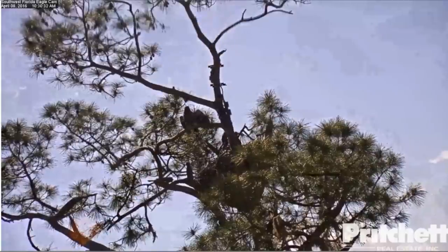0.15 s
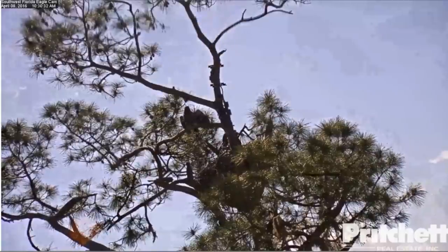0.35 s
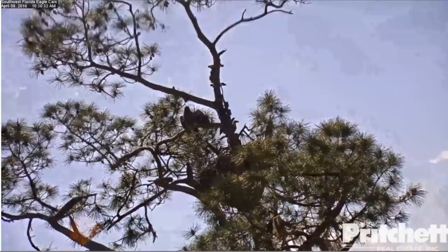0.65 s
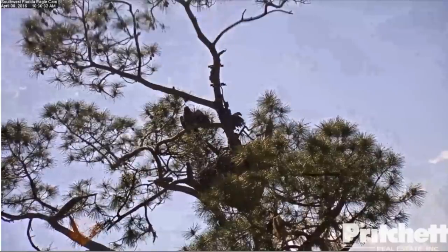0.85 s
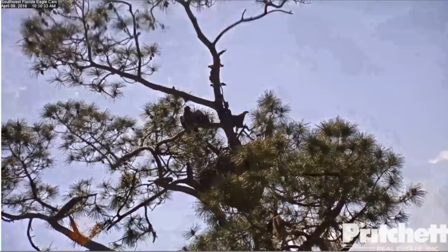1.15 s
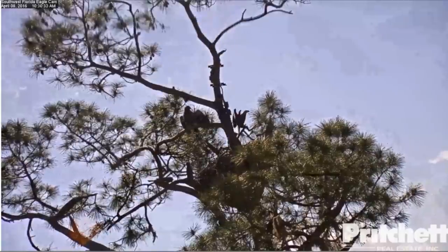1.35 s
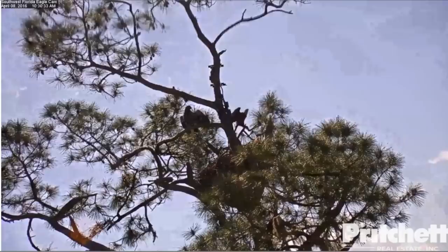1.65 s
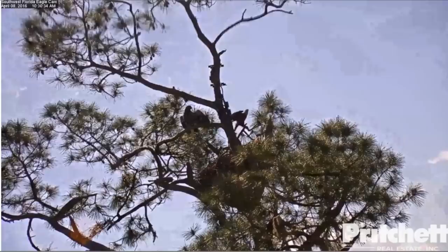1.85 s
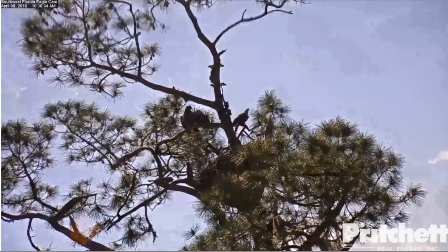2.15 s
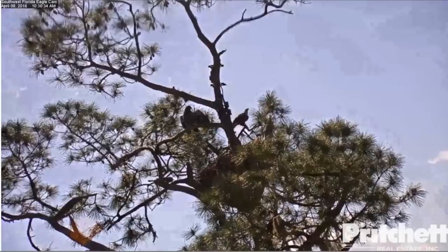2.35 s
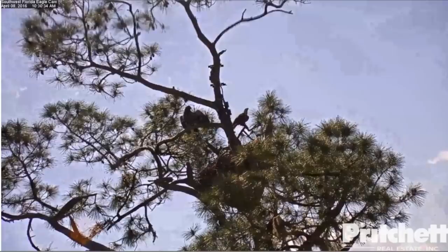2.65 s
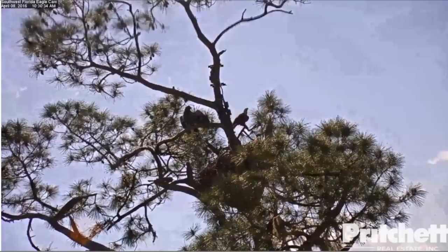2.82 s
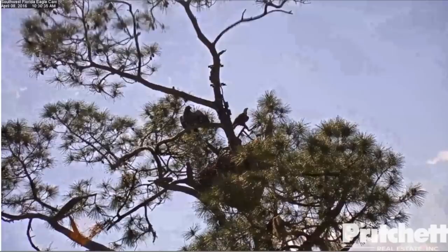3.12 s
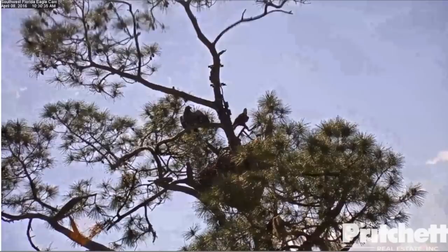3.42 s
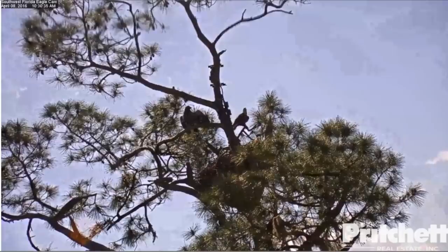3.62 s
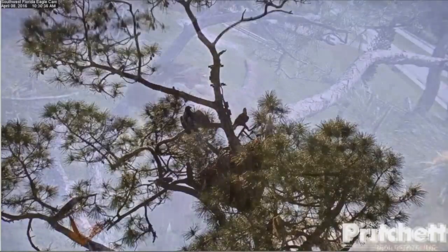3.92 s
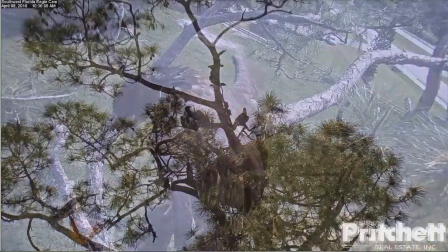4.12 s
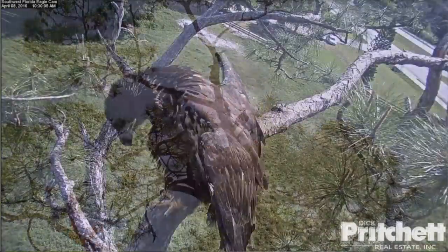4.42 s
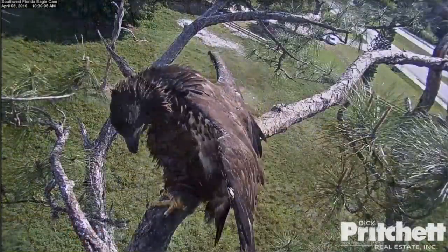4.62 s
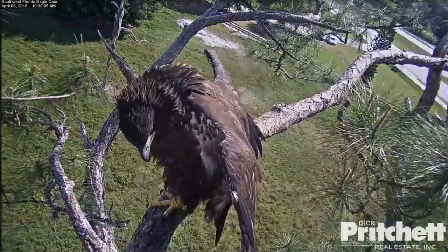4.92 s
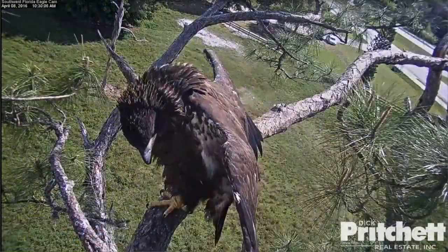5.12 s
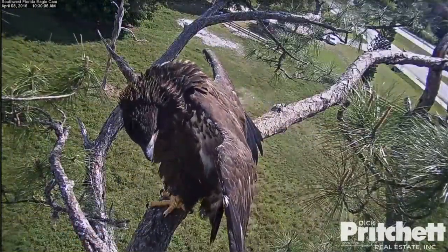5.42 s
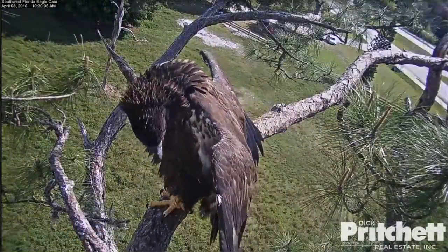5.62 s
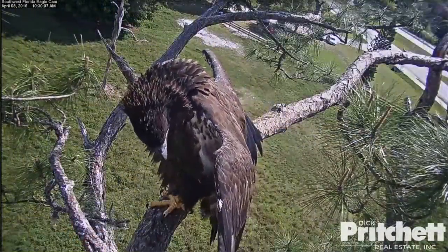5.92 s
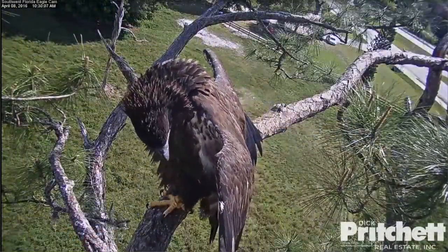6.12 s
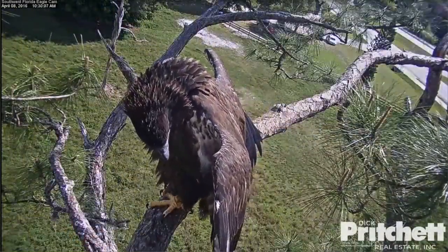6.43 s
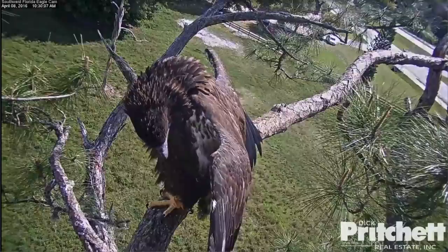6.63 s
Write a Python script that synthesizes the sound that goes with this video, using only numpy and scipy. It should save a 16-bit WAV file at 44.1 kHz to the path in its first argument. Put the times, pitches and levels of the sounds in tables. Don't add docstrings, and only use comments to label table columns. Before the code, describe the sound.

Outdoors in a pine near a nest, a young eagle calls in shrill gliding whistles. Wavering rising notes come first, then a long climb that leaps upward and drops, and another climb. After a pause the calls step higher and become ragged, then hold long and level. One last held whistle ends with a short tail. Soft needle hiss and distant traffic lie beneath; the band-limited microphone distorts slightly and cuts out briefly twice.

```python
import sys
import numpy as np
from scipy import signal
from scipy.fft import rfft, irfft, next_fast_len
from scipy.io import wavfile
from scipy.ndimage import uniform_filter1d, minimum_filter1d, map_coordinates

SR = 44100
rng = np.random.default_rng(int(sys.argv[2]) if len(sys.argv) > 2 else 0)


def gain_from_db(level_db):
    decades = np.asarray(level_db, float) / 20
    return 10 ** decades


def generate_wav(signal):
    frames = np.transpose(np.atleast_2d(signal))
    scaled = np.clip(frames, -1, 1) * 32767
    pcm = np.round(scaled).astype(np.int16)
    wavfile.write(sys.argv[1], SR, pcm)


N = 298557
TIME = np.arange(N) / SR
TURN_S = 0.03

# time in seconds, pitch in Hz, level in dB.
FIRST_CALLS = [
    [(0.0, 3093, -53), (0.064, 3166, -54), (0.084, 3274, -69.5), (0.094, 3365, -53)],
    [(0.098, 3396, -47), (0.18, 3320, -46.5), (0.221, 3230, -55.5), (0.241, 3390, -48),
     (0.279, 3490, -44.5), (0.46, 3395, -44.5), (0.53, 3428, -48.5), (0.65, 3476, -47.5),
     (0.705, 3560, -45)],
    [(0.742, 2728, -48), (0.747, 2764, -40.5), (0.9, 2807, -40.5), (1.165, 2990, -40.5),
     (1.184, 3330, -39.5), (1.196, 3400, -45.5), (1.215, 3450, -42), (1.271, 3275, -41.5),
     (1.287, 3030, -40.5)],
    [(1.854, 2757, -39), (1.882, 2845, -39.5), (1.995, 3026, -42.5), (2.075, 3257, -40.5),
     (2.147, 3277, -42.5), (2.265, 3423, -40), (2.317, 3370, -43.5), (2.564, 3464, -43.5),
     (2.596, 3403, -42)],
]
# time in seconds, pitch in Hz, level in dB.
CLIMBING_CALLS = [
    [(3.187, 2791, -47.5), (3.221, 2867, -40.5), (3.306, 2844, -49), (3.4, 3007, -40.5),
     (3.52, 3017, -42.5), (3.618, 3267, -44), (3.722, 3303, -48.5), (3.749, 3247, -38.5),
     (3.763, 3334, -46)],
    [(3.771, 3721, -59), (3.835, 3826, -58.5), (3.92, 3896, -49.5), (3.985, 3960, -47),
     (4.017, 3913, -48.5)],
    [(4.141, 4122, -57), (4.165, 3982, -48), (4.179, 4113, -51), (4.294, 4200, -57.5), (4.335, 4334, -54),
     (4.4, 4350, -49.5), (4.438, 4441, -51), (4.452, 4302, -50.5), (4.538, 4469, -56)],
    [(4.691, 4437, -43.5), (4.727, 4517, -42), (4.851, 4335, -42), (4.907, 4461, -42), (4.975, 4400, -42.5),
     (5.124, 4458, -42.5), (5.156, 4350, -42.5), (5.194, 4415, -42), (5.284, 4422, -41)],
]
# time in seconds, pitch in Hz, level in dB.
LAST_CALL = [
    [(5.797, 3818, -46), (5.931, 3973, -51), (6.008, 3965, -41.5), (6.268, 3980, -42.5), (6.368, 4150, -43),
     (6.387, 4045, -41.5), (6.459, 4173, -45), (6.549, 4130, -44), (6.599, 3990, -42)],
    [(6.651, 4050, -43), (6.699, 3940, -41.5), (6.719, 4000, -43), (6.737, 4190, -46.5), (6.765, 4100, -43)],
]
# time in seconds, pitch in Hz, level in dB.
PARTNER = [
    [(0.0, 3400, -74.5), (0.006, 3470, -64.5), (0.05, 3518, -69), (0.094, 3653, -58)],
    [(1.225, 3920, -81.5), (1.243, 4087, -52), (1.255, 3973, -61), (1.269, 3992, -73.5)],
    [(1.84, 3144, -70.5), (1.848, 3061, -47), (1.852, 3040, -62), (1.86, 3032, -77.5)],
    [(2.031, 3737, -58), (2.047, 3811, -61), (2.153, 3921, -53.5), (2.179, 3944, -51.5), (2.219, 3831, -75)],
    [(2.291, 3890, -68.5), (2.313, 4005, -53.5), (2.482, 4022, -54), (2.534, 3961, -57),
     (2.556, 4030, -54.5), (2.586, 3990, -57.5), (2.598, 3980, -66)],
    [(3.147, 2693, -54.5), (3.173, 3040, -51), (3.201, 3249, -56.5), (3.3, 3195, -54.5),
     (3.392, 3387, -57.5), (3.626, 3564, -55), (3.751, 3576, -59.5), (3.791, 3406, -54), (3.997, 3670, -60)],
]
# time in seconds, pitch in Hz, level in dB.
HIGH_PARTNER = [
    [(4.031, 4292, -59), (4.069, 4804, -66.5), (4.101, 4686, -65.5), (4.115, 4750, -72), (4.139, 4673, -63)],
    [(4.246, 3876, -50.5), (4.258, 3428, -50), (4.262, 3234, -52), (4.267, 2907, -54.5)],
    [(4.526, 2825, -49), (4.542, 3614, -51), (4.566, 3383, -46), (4.61, 3392, -44), (4.667, 3803, -43)],
    [(4.673, 4143, -69), (4.69, 4100, -48.5), (4.73, 4162, -60.5)],
    [(5.012, 4320, -64), (5.021, 3853, -49), (5.027, 3590, -44.5), (5.032, 2900, -49)],
    [(5.757, 2500, -56), (5.77, 2750, -44), (5.789, 3210, -40.5), (5.799, 3302, -43.5),
     (5.867, 3338, -44.0), (5.952, 3570, -50), (5.984, 3870, -42)],
    [(6.421, 5010, -99), (6.455, 5056, -69), (6.509, 4930, -62.5), (6.539, 5160, -77), (6.599, 5330, -65)],
    [(6.651, 4630, -56.5), (6.691, 4530, -60), (6.713, 4770, -71.5), (6.729, 4760, -89)],
]
# time in seconds, pitch in Hz, level in dB.
STRAY_WHISTLES = [
    [(4.051, 3657, -68), (4.087, 3920, -61), (4.117, 3686, -58), (4.149, 3670, -57.5)],
    [(5.364, 3685, -56), (5.38, 3605, -52), (5.41, 4238, -60.5), (5.466, 4292, -62.5), (5.507, 4870, -67),
     (5.693, 5189, -74), (5.771, 5060, -63.5), (5.829, 4980, -66)],
]
# start in seconds, overtone in dB, mirror below in dB, mirror above in dB, low tone in dB.
POSTURES = [(0, -41, -18, -5, -32.5), (.746, -11.5, -1, -38, -4.5), (1.8, -12.5, -3.5, -29.5, -8),
            (2.3, -14, 1, -35, -7), (3.1, -40, -17, -12.5, -33), (3.36, -21.5, -15.5, -12.5, -24.5),
            (3.6, -30, -11, -5.5, -25), (3.77, -48.5, -34.5, -31.5, -37.5), (4.5, -52, -43, -45, -24),
            (5.3, -20, -48, -45, -25), (5.75, -27.5, -17, -27, -14.5), (5.97, -56.5, -45.5, -51, -39)]


def eagle():
    notes = phrased(FIRST_CALLS + CLIMBING_CALLS + LAST_CALL)
    turn, loud = syrinx_side(notes, edge_s=0.0052, flutter_hz=8 + spells(column=4))
    partner_turn, soft = syrinx_side(PARTNER + HIGH_PARTNER, edge_s=0.004, flutter_hz=28)
    stray_turn, stray = syrinx_side(STRAY_WHISTLES, edge_s=0.008, flutter_hz=50.3)
    hoarse = 0.004 + uniform_filter1d(spells(column=2), round(TURN_S * SR))
    main = unlocked(turn, lead=0.52) * waver(hoarse)
    partner = soft * partner_turn * waver(hoarse + 0.06)
    overtone, below, above, low = (loud * gain_from_db(db) for db in held(POSTURES))
    ratio = partner / (loud + soft + 1e-5)
    doubled = overtone * (main + 0.5 * ratio) * (main + 0.8 * np.conj(ratio) * turn ** 2)
    mirrored = below * main * turn * np.conj(ratio)
    mirrored = mirrored + above * ratio * partner_turn * np.conj(main)
    difference = low * np.conj(main) * ratio
    overtone_hz = np.gradient(np.unwrap(np.angle(partner_turn))) * SR / np.pi
    ringing = gain_from_db(26) * partner ** 2 * waver(0.81) / (1 + ((overtone_hz - 6600) / 330) ** 4)
    breath = gain_from_db(-28) * loud * turn * (wobble(1500) + 1j * wobble(1500))
    whistles = loud * main + partner + ringing + stray * stray_turn * waver(0.25)
    return np.sqrt(2) * np.real(whistles + doubled + mirrored + difference + breath)


def syrinx_side(notes, edge_s, flutter_hz):
    s, hz, db = np.concatenate(notes).T
    sounding = sum((TIME >= note[0][0]) & (TIME < note[-1][0] + 0.006) for note in notes) > 0
    edge = round(edge_s * SR)
    gate = uniform_filter1d(uniform_filter1d(sounding * 1.0, edge), edge)
    pitch = np.interp(TIME, s, hz) + flutter_hz * wobble(70)
    turn = np.exp(2j * np.pi * np.cumsum(pitch) / SR)
    return turn, gate * gain_from_db(np.interp(TIME, s, db))


CLOSING, HELD_ON = (1, 2, 3, 5, 7), (6,)
FALL_S, SLACK_HZ, FADE_DB = 0.036, 2470, -12.5
KNEE, KNEE_DROP, KNEE_DB = 0.25, 0.17, -4.5
THROAT_HZ, THROAT_AT, SWELL_DB = 2810, 0.74, 2


def phrased(notes):
    done = []
    for k, note in enumerate(notes):
        s, hz, db = note[-1]
        ending = []
        if k in CLOSING:
            knee = (s + KNEE * FALL_S, hz + KNEE_DROP * (SLACK_HZ - hz), db + KNEE_DB)
            swell = (s + THROAT_AT * FALL_S, THROAT_HZ, db + SWELL_DB)
            ending = [knee, swell, (s + FALL_S, SLACK_HZ, db + FADE_DB)]
        elif k in HELD_ON:
            ending = notes[k + 1][:1]
        done.append(note + ending)
    return done


def unlocked(turn, lead):
    beat_hz, more_turns = 240, 0.45
    due = np.cumsum(spells(column=3)) / SR
    luck = rng.random((int(due[-1]), 3))
    starts = np.interp(np.arange(len(luck)) + 0.8 * luck[:, 0], due, TIME)
    turns = 1 + np.minimum(np.floor(np.log(luck[:, 1]) / np.log(more_turns)), 3)
    lengths = turns / beat_hz * (0.5 + 1.2 * luck[:, 2])
    slipped = sum(n * np.clip((TIME - s) / length, 0, 1) for s, length, n in zip(starts, lengths, turns))
    behind = 2 * np.pi * slipped
    return turn * np.exp(0.3j * behind) * (lead + (1 - lead) * np.exp(-1j * behind))


def waver(share):
    return np.sqrt(1 - share) + np.sqrt(share / 2) * (wobble(650) + 1j * wobble(650))


# start in seconds, end in seconds, share of irregular vibration from 0 to 1,
# slips a second, warble in Hz.
ROUGH_SPELLS = [(.19, .235, .15, 70, 25), (.652, .664, .02, 85, 0), (1.23, 1.27, .05, 0, 15),
                (2.33, 2.39, .06, 0, 12), (2.39, 2.59, .14, 55, 15), (3.645, 3.77, .06, 30, 12),
                (4.02, 4.12, .45, 0, 30), (4.15, 4.33, .14, 30, 45), (4.39, 4.47, .15, 50, 35),
                (4.7, 5.27, .006, 0, 8), (5.3, 5.79, .1, 0, 0), (5.8, 5.9, .12, 25, 15),
                (6.02, 6.6, .025, 34, 22), (6.66, 6.69, .05, 70, 15), (6.74, 6.77, .05, 70, 15)]


def spells(column):
    return sum(row[column] * ((TIME >= row[0]) & (TIME < row[1])) for row in ROUGH_SPELLS)


def held(rows):
    s, *columns = np.transpose(rows)
    row = np.searchsorted(s[1:], TIME)
    return [uniform_filter1d(column[row], round(TURN_S * SR)) for column in columns]


# start in seconds, peak in dB, centre in Hz.
BEAK_POPS = [
    (4.649, -60.5, 745),
    (5.028, -56.5, 641),
    (5.3, -55, 108),
]


def beak_pops():
    puffs = np.zeros(N)
    for s, db, hz in BEAK_POPS:
        envelope = np.exp(-((TIME - s - 0.004) / 0.0034) ** 2)
        puffs += gain_from_db(db) * envelope * np.sin(2 * np.pi * hz * (TIME - s))
    return puffs


def branch_echo(voice):
    t = TIME[:SR // 8]
    branches = rng.standard_normal(len(t)) * gain_from_db(-60 * t / 0.069)
    return signal.fftconvolve(voice, branches / np.linalg.norm(branches))[:N]


# time in seconds, level in dB.
WIND_LEVEL = [(0, -62.5), (.5, -64.5), (1.75, -65), (2.5, -66.5), (3.4, -63.5), (4.45, -66), (4.75, -61),
              (5.15, -61.5), (5.6, -65), (6.77, -64)]
# frequency in Hz, density in dB per Hz.
WIND_COLOUR = [(290, -57), (550, -15), (868, -10.5), (1370, -2.5), (1960, -5.5), (2840, 1), (4700, -24.5),
               (6200, -31), (7800, -52.5), (12000, -120)]
# frequency in Hz, density in dB per Hz.
TRAFFIC_COLOUR = [(15, -65.5), (25, -22), (233, -7.5), (358, -6), (448, -7.5), (700, -4.5), (910, -39),
                  (1540, -120)]


def air(voice):
    size = round(0.1 * SR)
    peak = -minimum_filter1d(-np.abs(voice), size, origin=size // 2 - 1)
    duck_db = -1.5 * uniform_filter1d(peak / (peak + gain_from_db(-44.5)), SR // 50)
    wind_db = np.interp(TIME, *np.transpose(WIND_LEVEL)) + 5.5 + duck_db + 0.41 * wobble(6)
    hiss = gain_from_db(wind_db) * rush(WIND_COLOUR, patchy_db=1.5)
    drone = unit(filtered(rng.standard_normal(N), lambda hz: 1 / (1 + ((hz - 133) / 17) ** 2)))
    rumble = rush(TRAFFIC_COLOUR, patchy_db=-2.0) + gain_from_db(-13.5) * drone
    traffic_db = -75.5 + 1.6 * duck_db + 1.7 * wobble(2.3) + 1.3 * wobble(7.6)
    return hiss + gain_from_db(traffic_db) * rumble


def rush(spectrum, patchy_db):
    z = signal.stft(rng.standard_normal(N), nperseg=512)[2]
    field = uniform_filter1d(rng.standard_normal(z.shape), size=5, axis=0)
    field = uniform_filter1d(field, size=10, axis=1)
    noise = signal.istft(z * gain_from_db(patchy_db * unit(field)), nperseg=512)[1][:N]
    return unit(filtered(noise, lambda hz: along(spectrum, hz)))


def wobble(rate):
    knots = rng.standard_normal(int(N * rate / SR) + 4)
    return unit(map_coordinates(knots, [TIME * rate]))


def unit(x):
    return x / np.sqrt(np.mean(np.abs(x) ** 2) + 1e-20)


def filtered(x, response):
    m = next_fast_len(N + 8192)
    return irfft(rfft(x, m) * response(np.fft.rfftfreq(m, 1 / SR)), m)[:N]


def along(points, hz):
    f, db = np.transpose(points)
    return gain_from_db(np.interp(np.log(hz + 1), np.log(f + 1), db))


# start in seconds, level in dB.
FACING = [(0, 12.5), (.74, 35), (1.8, 27), (2.3, 33), (3.1, 26.5), (3.85, 34.5), (4.4, 15.5), (4.58, 31),
          (5.27, 38), (5.75, 33), (6.3, 27.5)]


def lifted_hiss(voice, background):
    colour = [(3700, -39.0), (4200, 3.5), (4800, 2), (5400, -1), (5800, -7), (6400, -2), (7000, 0.5)]
    return gain_from_db(held(FACING)[0]) * filtered(voice * background, lambda hz: along(colour, hz))


def scene():
    voice = eagle()
    background = air(voice)
    echo = gain_from_db(-32.5) * branch_echo(voice)
    return (voice + echo + beak_pops() + background + lifted_hiss(voice, background))[None]


# frequency in Hz, gain in dB.
BEND_COLOUR = [(20, -6), (100, -29.5), (700, -28), (2000, -22), (4400, -14.5), (5400, -5.5), (7000, -7)]


def preamp(x):
    envelope = np.abs(signal.hilbert(x, next_fast_len(N))[:N])
    x = x / (1 + (envelope / 0.022) ** 4) ** 0.18
    x = x + gain_from_db(19.0) * filtered(x ** 2, lambda hz: along(BEND_COLOUR, hz))
    return filtered(x, lambda hz: (hz > 12) / (1 + (hz / 7700) ** 40))


def starved_stream(x, mask_db, grain_db, quiet_db, low_db):
    frame = 5644
    hz, _, z = signal.stft(x, SR, "cosine", frame)
    band = np.floor(24 * np.log(1 + hz / 700)).astype(int)
    power = np.array([np.mean(np.abs(z[band == b]) ** 2, 0) for b in range(band.max() + 1)])
    centre = np.bincount(band, hz) / np.bincount(band)
    octaves = np.log2(centre[:, None] / centre)
    slope_db = np.where(octaves > 0, 14 * octaves, np.minimum(-60 * octaves, 24))
    mask = gain_from_db(2 * mask_db - slope_db) @ power
    dull = gain_from_db(low_db * np.clip(np.log2(450 / centre), 0, 2) * (centre > 75))[:, None]
    luck = gain_from_db(5 * rng.standard_normal(power.shape))
    kept = power * luck > dull * mask + gain_from_db(2 * quiet_db)
    noise = signal.stft(rng.standard_normal(N), SR, "cosine", frame)[2] * 60
    grain = gain_from_db(grain_db) * np.sqrt(power[band]) * noise
    return signal.istft((z + grain) * kept[band], SR, "cosine", frame)[1][:N]


# start in seconds, return in seconds.
SILENCES = [
    (3.0984, 3.141),
    (6.6025, 6.646),
]


def dropouts(x):
    for stop, back in SILENCES:
        x = x * np.where(TIME < stop, 1, np.clip((TIME - back) / 0.013, 0, 1) ** 2)
    return x


def top_cut(x):
    return signal.sosfilt(signal.butter(12, 16000, fs=SR, output="sos"), x)


def record(dry):
    x = preamp(dry[0])
    x = starved_stream(x, mask_db=-36.5, grain_db=-18, quiet_db=-116, low_db=9)
    x = dropouts(x)
    return top_cut(x[None])


dry = scene()
out = record(dry)
generate_wav(out)
```